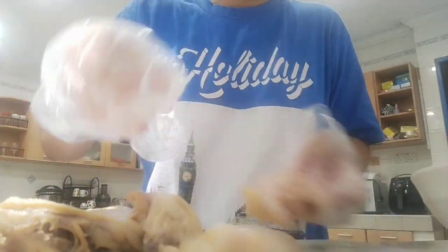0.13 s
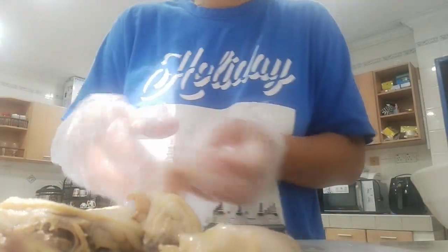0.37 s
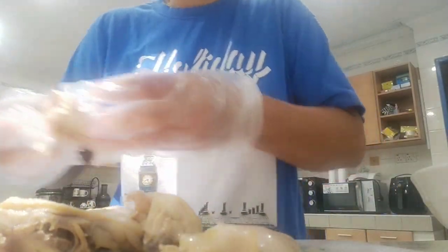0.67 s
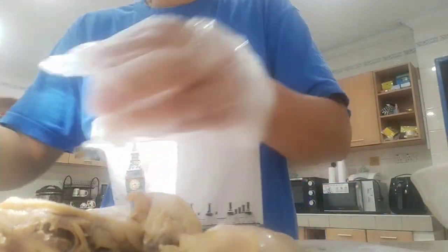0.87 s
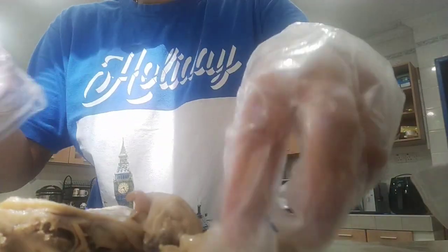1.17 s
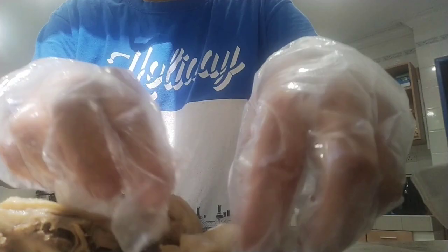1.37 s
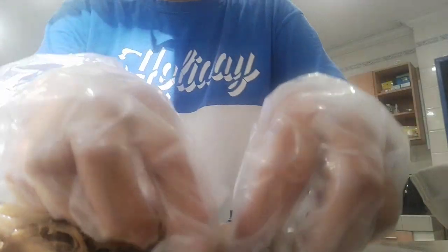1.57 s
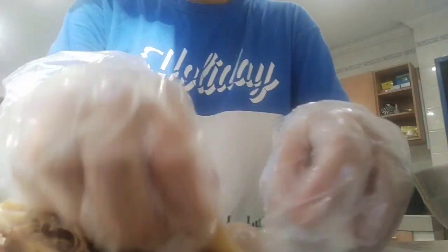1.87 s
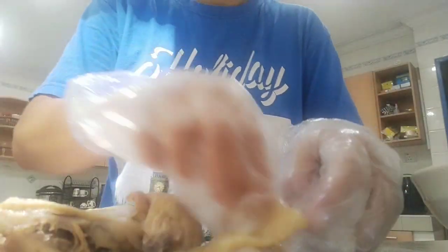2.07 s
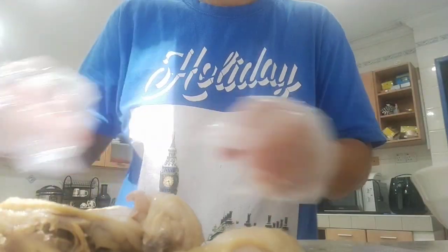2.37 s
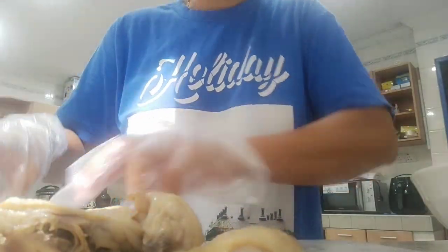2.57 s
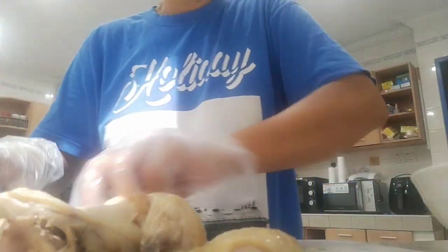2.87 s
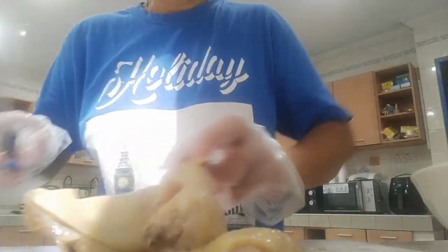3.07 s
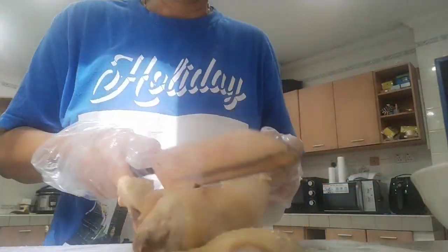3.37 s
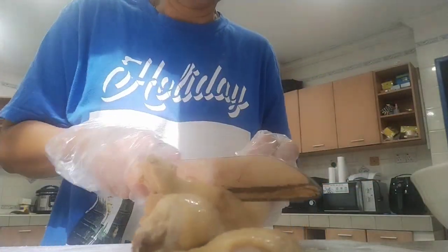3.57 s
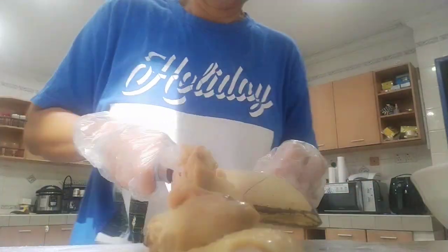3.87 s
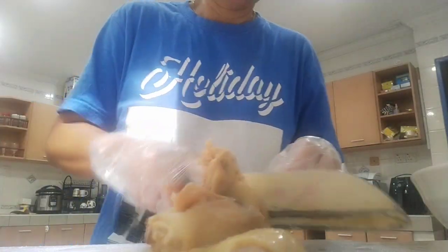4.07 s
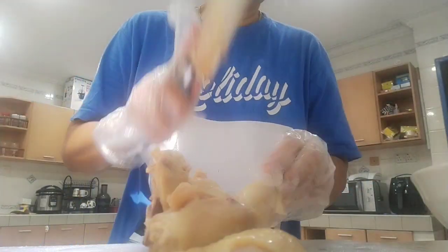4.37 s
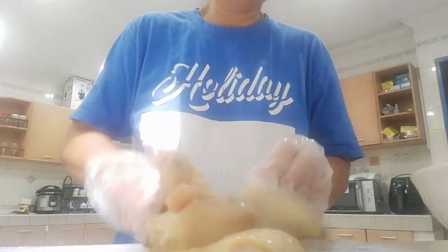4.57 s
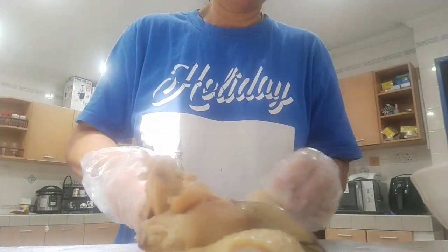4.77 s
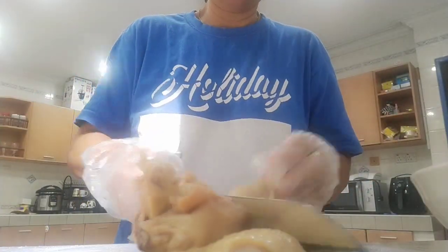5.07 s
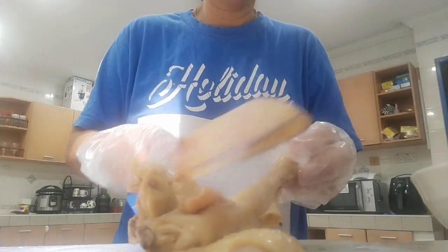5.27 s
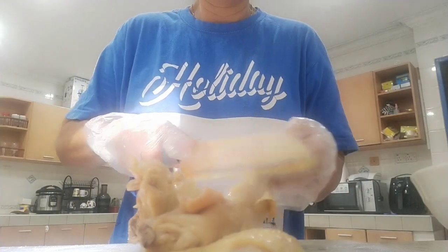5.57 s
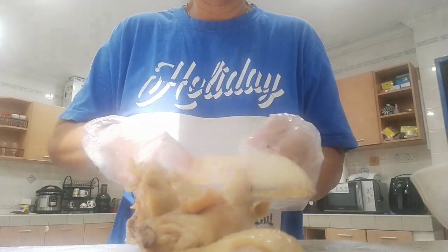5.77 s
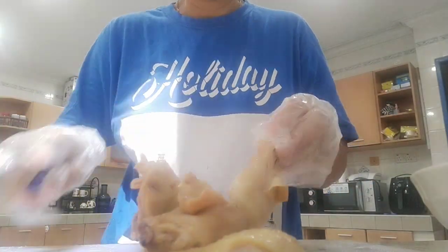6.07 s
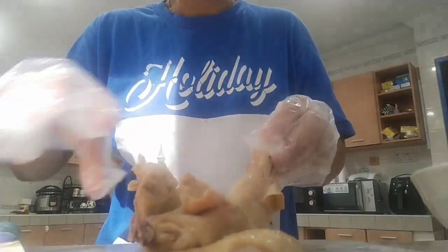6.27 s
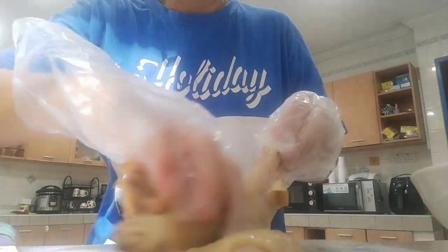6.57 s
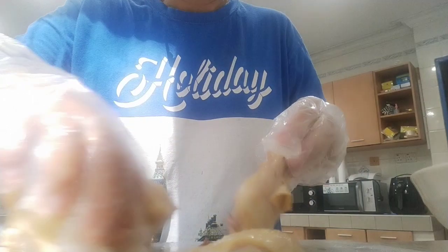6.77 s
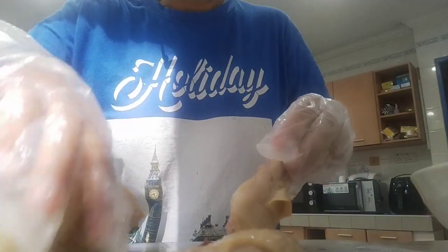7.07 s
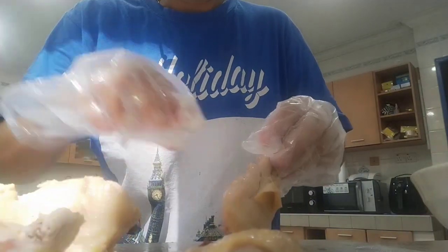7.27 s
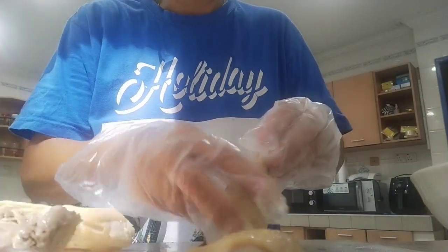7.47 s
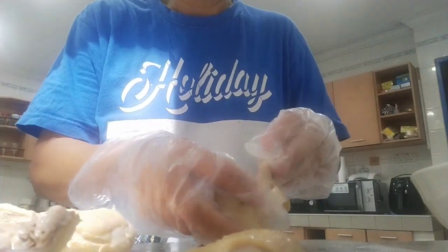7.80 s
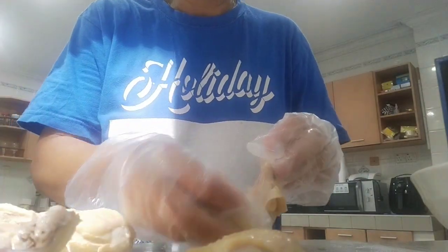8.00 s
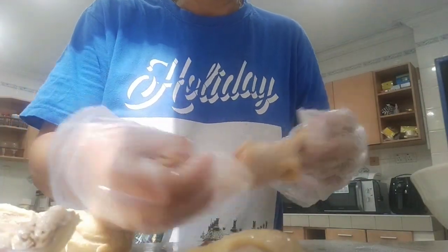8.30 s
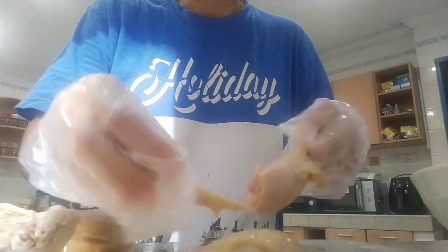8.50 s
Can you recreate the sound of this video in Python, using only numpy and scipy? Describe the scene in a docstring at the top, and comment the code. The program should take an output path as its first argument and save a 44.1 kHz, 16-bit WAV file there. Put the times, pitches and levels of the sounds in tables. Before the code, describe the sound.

Close, dry rustling of plastic-gloved hands pulling cooked meat, broken by a very loud chop and later a thudding drop, over faint appliance hum.

```python
"""Tiled kitchen: hands in thin plastic gloves pull cooked meat apart close to a small microphone.
The film crackles as clumped random clicks and larger pops, filtered by size of fold.
A cleaver chops once through bone, its steel rings briefly, and it is later dropped on the board:
rattling contacts excite the board's modes and the room. Appliances hum behind, as wavering sines.
The recorder's limiter holds the level down for a tenth of a second after each loud blow."""
import sys
import numpy as np
from scipy import signal
from scipy.fft import rfft, irfft
from scipy.io import wavfile
from scipy.ndimage import uniform_filter1d, minimum_filter1d

SR = 44100
rng = np.random.default_rng(int(sys.argv[2]) if len(sys.argv) > 2 else 0)


def materialize(psi):
    """Save the field psi as 16-bit PCM at rate SR to the path in sys.argv[1].

    A 1-D psi becomes a single channel; in a 2-D psi each row is a channel.
    """
    bounded = np.clip(np.atleast_2d(psi).T, -1, 1)
    quanta = np.round(bounded * 32767).astype(np.int16)
    wavfile.write(sys.argv[1], SR, quanta)


def magnitude_from_level(level_db):
    """Linear magnitude for a level in decibels (20 dB per decade)."""
    exponent = np.asarray(level_db, float) / 20
    return 10 ** exponent


N = 381024


def evened(x):
    """Scale to rms 1."""
    return x / np.sqrt(np.mean(x ** 2) + 1e-20)


def read(points, hz):
    """Interpolate a (frequency [Hz], value) table over log frequency."""
    f, value = np.transpose(points)
    return np.interp(np.log(hz + 1), np.log(f + 1), value)


def add(mix, start_s, sound):
    """Add a sound in place, cut at the end of the mix."""
    part = mix[round(start_s * SR):][:len(sound)]
    part += sound[:len(part)]


def drift(knots_per_s):
    """Slow random curve: straight lines between normal knots of rms 1."""
    knots = rng.standard_normal(400)
    return np.interp(np.arange(N) / SR * knots_per_s, np.arange(len(knots)), knots)


def causal(gain_db):
    """Minimum-phase impulse for gains given on 2049 bins."""
    log_gain = np.log(magnitude_from_level(np.r_[gain_db, gain_db[-2:0:-1]]))
    return np.fft.ifft(np.exp(np.conj(signal.hilbert(log_gain)))).real[:2048]


# room hiss spectrum: (frequency [Hz], relative level [dB per Hz])
HISS = [(88, -28), (150, 5.5), (341, -1), (414, 4.5), (821, 4.5), (960, -1), (1390, -5.5), (1560, -4),
        (2310, -9), (5570, -67.5), (7920, 8.5), (10000, -35), (12400, -22), (15100, -24), (16000, -9)]
# slow rumble spectrum: (frequency [Hz], relative level [dB per Hz])
RUMBLE = [(1, -1), (5, 15), (15, -2), (35, 3), (70, -5), (130, -2.5), (200, -31.5)]
# motor hum, two motors a few Hz apart throb against each other; negative frequency = antiphase:
# (frequency [Hz], level [dB rms], waver [dB])
HUM = [(49, -58, .6), (100, -57, 1), (146.8, -73, 2), (290.7, -76, 2), (-107.746, -58, 1.5),
       (215.5, -70, 2.5)]
HISS_DB_RMS, RUMBLE_DB_RMS = -55, -55
HUM_NULL_S = 0.062  # all sines cross zero here; the throb is at a minimum


def shaped_noise(spectrum):
    """Gaussian noise of rms 1, coloured in the frequency domain."""
    hz = np.fft.rfftfreq(N, 1 / SR)
    return evened(irfft(rfft(rng.standard_normal(N)) * magnitude_from_level(read(spectrum, hz)), N))


def motor_hum():
    """Sines of running motors, each wavering in level; close pairs beat."""
    t = np.arange(N) / SR - HUM_NULL_S
    return sum(magnitude_from_level(db + waver_db * drift(3.1)) * np.sqrt(2) * np.sin(2 * np.pi * hz * t)
               for hz, db, waver_db in HUM)


def background():
    """Room hiss, slow rumble and motor hum."""
    hiss = magnitude_from_level(HISS_DB_RMS) * shaped_noise(HISS)
    rumble = magnitude_from_level(RUMBLE_DB_RMS) * shaped_noise(RUMBLE)
    return hiss + rumble + motor_hum()


# kitchen reverberation: (frequency [Hz], t60 [s])
KITCHEN = [(250, 0.39), (700, 0.88), (1500, 0.82), (3000, 0.82), (8000, 0.79), (15000, 1)]


def room_tail(build_s=0.019):
    """Diffuse tail of energy 1: noise, each band dying at its own speed."""
    hz, t, z = signal.stft(rng.standard_normal(int(1.3 * SR)), SR, nperseg=256)
    decay = magnitude_from_level(-60 * t / read(KITCHEN, hz)[:, None])
    tail = signal.istft(z * decay, SR, nperseg=256)[1]
    tail *= 1 - np.exp(-np.arange(len(tail)) / SR / build_s)
    return tail / np.linalg.norm(tail)


# modes of steel pulled free: (frequency [Hz], level [dB], t60 [s])
BLADE = [(12300, -33, .03), (14000, -34, .03), (15600, -37, .03)]
BLADE_S, BLADE_SLIDE_S = 4.561, 0.016


def blade():
    """Thin steel sings as it slides out: modes with wandering phase hold for the slide, then decay."""
    t = np.arange(SR // 10) / SR
    sound = np.zeros(len(t))
    for hz, db, t60_s in BLADE:
        wander_rad = np.cumsum(rng.standard_normal(len(t))) / np.sqrt(SR / 400)
        envelope = magnitude_from_level(db - 60 * np.maximum(t - BLADE_SLIDE_S, 0) / t60_s) * np.minimum(t / 0.0013, 1)
        sound += envelope * np.sin(2 * np.pi * hz * t + wander_rad)
    return sound


def jolt(scale_db=-4.0, settle_s=0.052, suck=0.97):
    """After the chop a slow swing follows: it dips, swings up and slowly settles."""
    u = np.arange(SR) / SR / settle_s
    return magnitude_from_level(scale_db) * (u - suck) * np.exp(-u) * np.minimum(u / 0.1, 1)


# flat of the cleaver on the board: (frequency [Hz], relative level [dB per Hz])
SOFT = [(88, -51), (150, -29), (179, -21), (254, -26), (303, -15.5), (475, -29.5), (566, -18), (612, -27),
        (675, 1), (871, 4), (2140, -18), (2360, -12.5), (5460, -36), (16000, -39)]
# edge through bone: (frequency [Hz], relative level [dB per Hz])
HARD = [(120, -80), (200, -38), (263, -20), (299, -11.5), (424, -6.5), (671, -2.5), (735, -28),
        (791, -10.5), (1560, -12.5), (1740, -5), (2130, -10), (5940, -21), (7970, -17.5), (16000, -64)]
# modes of board and counter: (frequency [Hz], level [dB], t60 [s])
BOARD = [(208, -47.5, 0.057), (315, -42.5, 0.058), (575, -39.5, 0.13), (688.8, -27.5, 0.078),
         (872.4, -34.5, 0.12), (1250, -37.5, 0.058), (1376, -49, 0.76)]
EDGE_DB_PER_OCTAVE, EDGE_PER_DB = 0.9, 0.6  # direct tilt at full scale; weaker blows are duller


def blow(peak_db, hardness, room_db, contact_ms):
    """Rattling contact: broad crack plus board modes; direct tilt follows level, the room's is flat."""
    t, hz = np.arange(SR) / SR, np.fft.rfftfreq(4096, 1 / SR)
    hardness = np.clip(hardness, 0, 1)
    colour_db = (1 - hardness) * read(SOFT, hz) + hardness * read(HARD, hz)
    modes = sum(magnitude_from_level(db - 60 * t / t60_s) * np.sin(2 * np.pi * f * t) for f, db, t60_s in BOARD)

    def struck(tilt_db):
        crack = causal(colour_db + tilt_db * np.log2(hz / 1000 + 0.78))
        return np.pad(crack / np.linalg.norm(crack), (0, SR - len(crack))) + modes

    rattle = 0.21 * rng.standard_normal(2000) * np.exp(-t[:2000] * 1000 / contact_ms)
    rattle[0] = 1
    near = signal.oaconvolve(struck(EDGE_DB_PER_OCTAVE + EDGE_PER_DB * peak_db), rattle)
    far = struck(0)
    sound = magnitude_from_level(room_db) * signal.oaconvolve(far / abs(far).max(), room_tail())
    add(sound, 0, near / abs(near).max())
    return magnitude_from_level(peak_db) * sound


# blows on the board, direct peak ahead of the limiter, room relative to it:
# (time [s], direct peak [dB], hardness [0-1], room [dB], contact [ms])
BLOWS = [(.851, -29.5, 0.14, -3, 10), (.868, -31, 0.08, -0.5, 4), (2.986, -26.5, 0.2, -7, 1.7),
         (4.4435, -13, 0.7, 4, 16), (4.4494, 8, 0.76, 5, 0.61), (4.4527, 8, 0.23, 2.5, 0.69),
         (4.4554, 0.5, 0.85, 12, 0.7), (4.995, -28, 0.3, -10, 6), (6.035, -0.5, 0.19, -2.5, 7),
         (6.1531, 7.5, 0.07, -4, 0.78), (6.182, -15, 0, -4.5, 5), (6.66, -26.5, 0.38, 8.5, 12),
         (6.724, -31, 0, 5.5, 11), (6.758, -36.5, 0.06, 0, 8), (6.85, -37.5, 0.1, -31, 7.1),
         (7.312, -40, 0.45, -17, 2.5), (7.441, -35.5, 0.3, -3, 8)]
CHOP_S = BLOWS[4][0]


def board_blows():
    """All contacts with the board, each with its own rattle and room tail."""
    mix = np.zeros(N)
    for start_s, *stroke in BLOWS:
        add(mix, start_s, blow(*stroke))
    return mix


# moves of the hands, a grab, pull or turn; slack film is fuller, taut film thinner:
# (start [s], length [s], rustle [dB], body [dB])
MOVES = [(0, .22, -53.5, -3.5), (.23, 0.3, -45, -4), (.57, 0.27, -51, -5.5), (.86, 0.19, -43, -5),
         (1.08, 0.14, -47, -3.5), (1.25, 0.19, -47.5, -2.5), (1.48, 0.31, -44.5, -2), (1.8, .09, -50.5, 0),
         (1.91, 0.05, -48, -5.5), (2.0, 0.15, -46.5, -2.5), (2.24, 0.2, -52, -6), (2.41, .14, -48, -2.5),
         (2.57, .45, -45.5, -1), (3.04, 0.33, -46, -6.5), (3.44, 0.14, -52.5, -2),
         (3.65, 0.56, -53.5, -2.5), (4.13, 0.058, -69, -14), (4.33, 0.14, -52, -9),
         (4.456, 0.092, -35, -14), (4.6, 0.12, -66, -12), (4.88, 0.16, -46.5, -2), (5.23, .14, -48.5, -7),
         (5.43, 0.21, -51.5, -4.5), (5.73, 0.068, -47.5, -6.5), (5.9, 0.24, -50.5, -4.5),
         (6.1, 0.054, -45, 3), (6.27, 0.19, -45.5, 2.5), (6.385, 0.1, -42.5, 0.5), (6.55, 0.16, -48, -1),
         (6.85, 0.18, -45.5, -6), (7.131, 0.11, -46.5, -5), (7.27, .21, -45.5, -4), (7.55, 0.12, -52, -2.5),
         (7.69, 0.12, -46.5, -4.5), (7.87, 0.16, -50, -2), (8.08, 0.16, -52.5, -2), (8.3, 0.047, -49, -1.5),
         (8.539, 0.099, -49, 1)]
GRAB_DB_PER_S, LET_GO_DB_PER_S, STILL_DB = 1500, 190, -71.5  # swell, die-away, resting film


def hands():
    """Rustle level and body in dB: moves swell, hold, die over resting film; the loudest sets the body."""
    t = np.arange(0, N, 64) / SR
    start, length, level_db, body_db = np.transpose(MOVES)[:, :, None]
    swell_db = GRAB_DB_PER_S * np.maximum(start - t, 0)
    die_db = LET_GO_DB_PER_S * np.maximum(t - start - length, 0)
    power = magnitude_from_level(2 * (level_db - swell_db - die_db)) + 1e-30
    total = power.sum(0)
    rustle_db = 10 * np.log10(total + magnitude_from_level(2 * STILL_DB))
    mean_body_db = (power * body_db).sum(0) / total
    return (np.interp(np.arange(N) / SR, t, curve) for curve in (rustle_db, mean_body_db))


def film_clicks(level_db, body_db):
    """Tiny clicks of buckling film in runs; rows are large, middling and small folds."""
    runs = 1.6 * evened(uniform_filter1d(rng.standard_normal(N), 350))
    flicker = evened(uniform_filter1d(rng.standard_normal((3, N)), 300))
    clumps = magnitude_from_level(runs + np.c_[[2.2, 2.2, 3.4]] * flicker)  # small folds flicker most
    sizes = magnitude_from_level(2.74 * np.minimum(rng.exponential(1, (3, N)), 4)) * rng.standard_normal((3, N))
    clicks = sizes * (rng.random((3, N)) < 7000 / SR) * clumps  # mean 7000 per s and row
    clicks = clicks / np.sqrt(np.mean(clicks ** 2)) * magnitude_from_level(level_db)
    clicks[0] *= magnitude_from_level(body_db + 4.5)
    clicks[1] *= magnitude_from_level(0.39 * body_db + 2 * drift(14) - 1.7)
    return clicks


POPS_PER_S, POP_OVER_DB, POP_SPREAD_DB = 65, 1, 5


def chance_pops(level_db):
    """Smaller pops at random times, their level following the rustle."""
    at = np.flatnonzero(rng.random(N) < POPS_PER_S / SR)
    chance = rng.standard_normal((N, 2))[at]
    pop_db = level_db[at] + POP_OVER_DB + POP_SPREAD_DB * chance[:, 0]
    return np.c_[at / SR, pop_db, -17 + 5 * chance[:, 1]]


# single creases popping, nominal level ahead of the fold gains, fullness = share of the larger folds:
# (time [s], level [dB], fullness [dB])
SNAPS = [(0.1929, -29, -11), (0.2602, -37, 0), (0.6982, -39, -12), (0.7331, -46, -18), (0.789, -31.5, -6),
         (0.9382, -29, -8), (1.0285, -27, 1), (1.3652, -34, -14), (1.486, -29, -7), (1.5039, -30, -12),
         (1.5867, -33, -19), (1.7214, -25, 1), (1.8661, -19.5, -15.5), (1.921, -26, -13),
         (2.0377, -27, -16), (2.115, -20, -8.5), (2.147, -21, -20), (2.169, -23.5, -11), (2.5819, -31, -12),
         (3.236, -33, -16), (3.7548, -36, -14), (4.2456, -43, -3), (4.7454, -31, -12), (4.9311, -29, -12),
         (5.1141, -30.5, -10), (5.24, -26, -16), (5.2998, -27, -22), (5.5936, -33, -21), (5.7408, -29, -22),
         (6.3938, -19, -9), (6.4319, -19, -23), (6.8587, -43, -14), (6.94, -22, -13), (7.0323, -26, -11),
         (7.1555, -32, -15), (7.447, -28, -6), (7.8769, -31, -14), (8.0126, -38, -15), (8.3039, -38, -12),
         (8.54, -36, -6)]
# crackle colour: (frequency [Hz], relative level [dB per Hz])
FILM = [(180, -8.5), (300, -11), (440, -2), (546, -13.5), (801, 0), (994, -9.5), (1390, -1), (1560, -11),
        (2520, -0.5), (2930, -6), (5520, -8.5), (7950, -1), (11900, -8), (15000, 1), (16000, -3.5)]


def gloves():
    """Clicks and pops of buckling film ring through a pulse per fold size, close and in the room."""
    level_db, body_db = hands()
    clicks = film_clicks(level_db, body_db)
    u = np.arange(800) / SR / 0.0014  # a pop lasts a few ms
    for when_s, pop_db, full_db in [*SNAPS, *chance_pops(level_db)]:
        burst = rng.standard_normal((3, 800)) * (u + 0.1) * np.exp(1 - u)
        for fold, fold_db in enumerate((1.14 * full_db - 12, 0.7 * full_db - 6.5, -11)):
            add(clicks[fold], when_s, magnitude_from_level(pop_db + fold_db) * burst[fold])
    hz = np.fft.rfftfreq(4096, 1 / SR)
    low = 1 / (1 + (hz / 5000) ** 6)
    high = 1 / (1 + (10000 / (hz + 1)) ** 12)
    shares = low, (1 - low) * (1 - high), high
    pulses = [causal(read(FILM, hz) + 10 * np.log10(share + 1e-5)) for share in shares]
    near = sum(signal.oaconvolve(c, p)[:N] for c, p in zip(clicks, pulses)) / np.linalg.norm(pulses[2])
    return near + magnitude_from_level(-5.5) * signal.oaconvolve(near, room_tail())[:N]


def scene():
    """Background, cleaver and gloves in one channel."""
    mix = background() + board_blows() + gloves()
    add(mix, BLADE_S, blade())
    add(mix, CHOP_S, jolt())
    return mix[None]


def held(x, behind_s, ahead_s):
    """Largest value in a window reaching back and ahead."""
    behind, ahead = round(behind_s * SR), round(ahead_s * SR)
    padded = np.pad(x, (behind, ahead))
    return -minimum_filter1d(-padded, behind + ahead)[(behind + ahead) // 2:][:N]


def limiter(x):
    """Look-ahead limiter at -6.2 dB: holds its cut, then drops it within a few ms."""
    over_db = np.maximum(20 * np.log10(abs(x[0]) + 1e-9) + 6.2, 0)
    renewed_db = (over_db > 0) * held(over_db, 0.008, 0)  # a quick second peak restarts the hold
    return x / magnitude_from_level(uniform_filter1d(held(renewed_db, 0.091, 0.007), size=110))


def compressor(x):
    """Eases long loud sounds: 16 ms mean power, 0.11 dB cut per dB above -19.5 dB."""
    keep = np.exp(-1 / (0.016 * SR))
    power_db = 10 * np.log10(signal.lfilter([1 - keep], [1, -keep], x[0] ** 2) + 1e-12)
    return x / magnitude_from_level(0.11 * np.maximum(power_db + 19.5, 0))


def band_limit(x):
    """A steep low-pass at the top of the band."""
    return signal.sosfilt(signal.butter(12, 17000, fs=SR, output="sos"), x)


def record(dry):
    """Recorder: limiter, compressor, 0.36 Hz high-pass, 15.95 kHz low-pass."""
    eased = compressor(limiter(dry))
    steady = signal.lfilter([1, -1], [1, -np.exp(-2 * np.pi * 0.36 / SR)], eased)
    low_pass = signal.firwin(511, 15950, window=("kaiser", 9), fs=SR)
    band = signal.oaconvolve(steady, low_pass[None], "same")
    return band_limit(band)


dry = scene()
out = record(dry)
materialize(out)
```